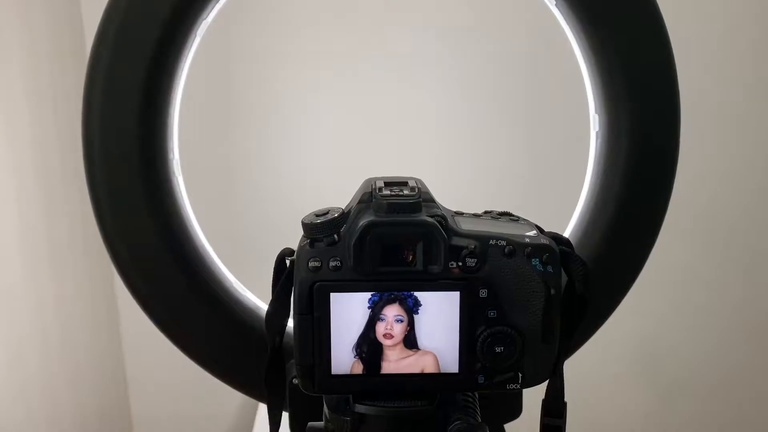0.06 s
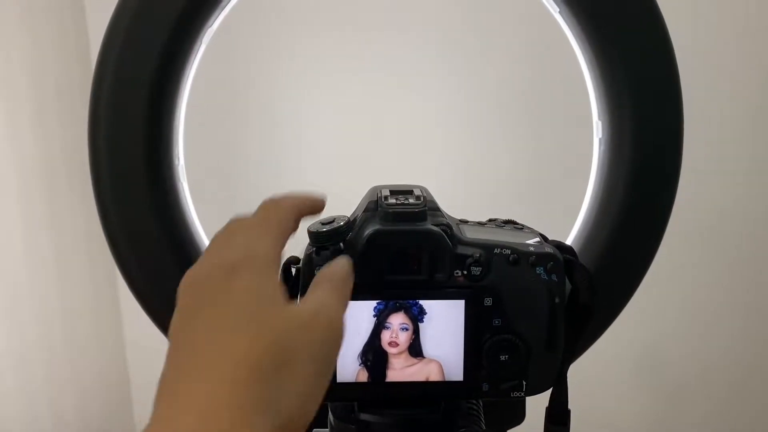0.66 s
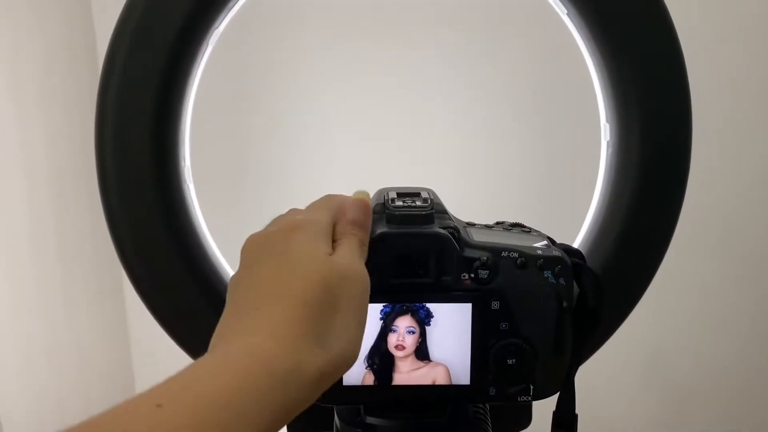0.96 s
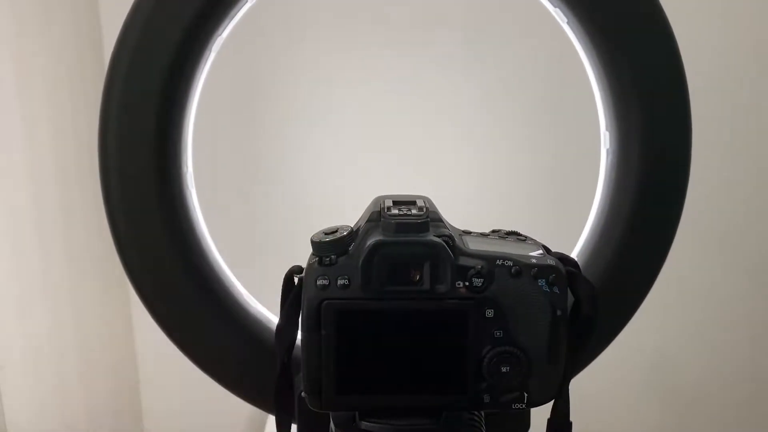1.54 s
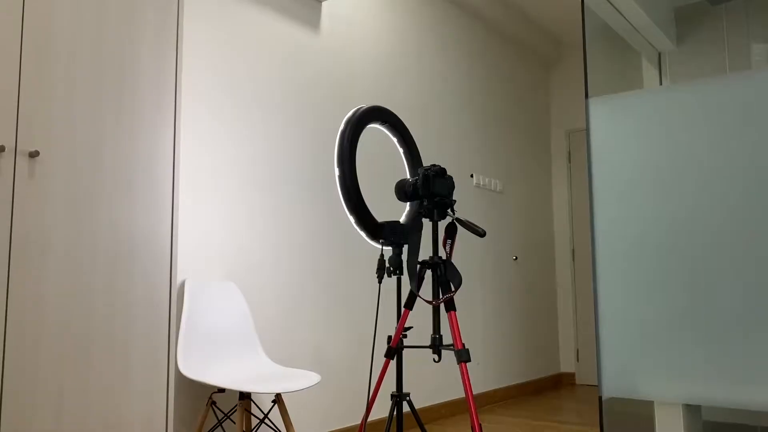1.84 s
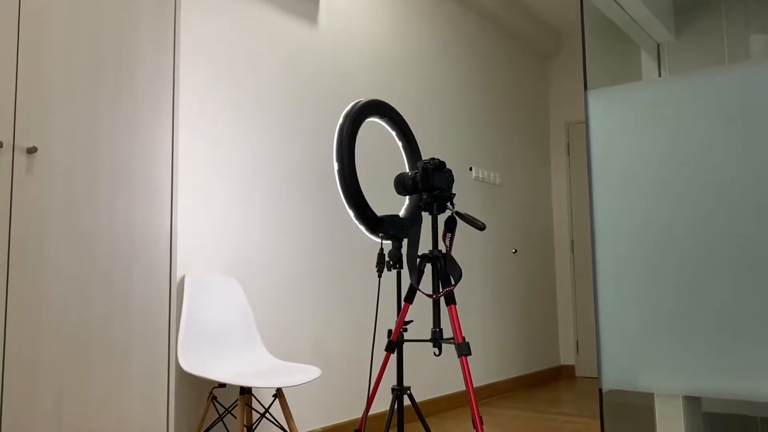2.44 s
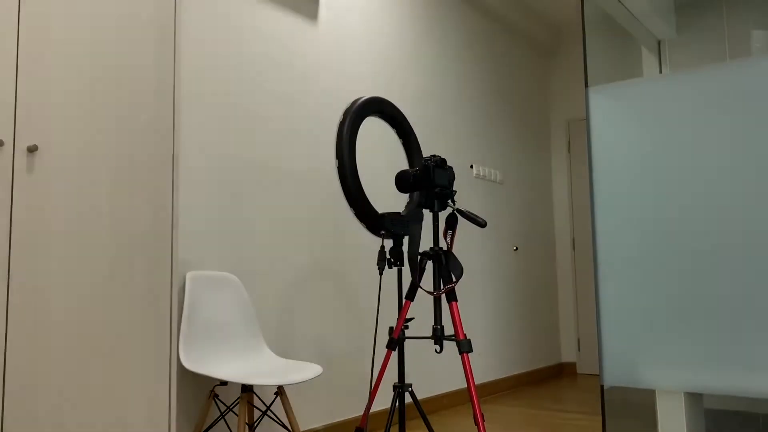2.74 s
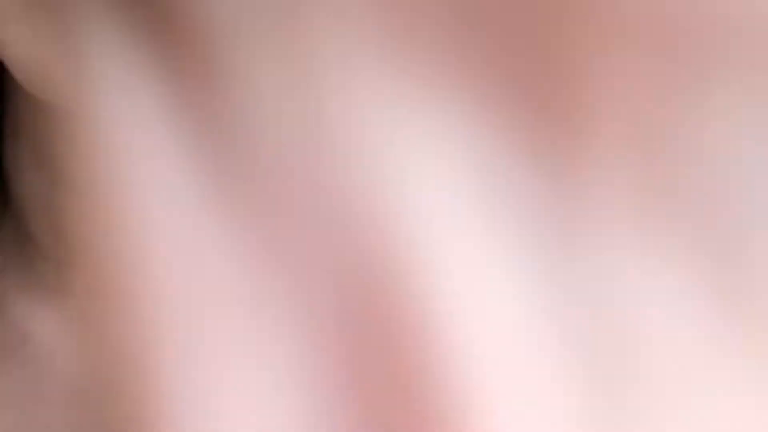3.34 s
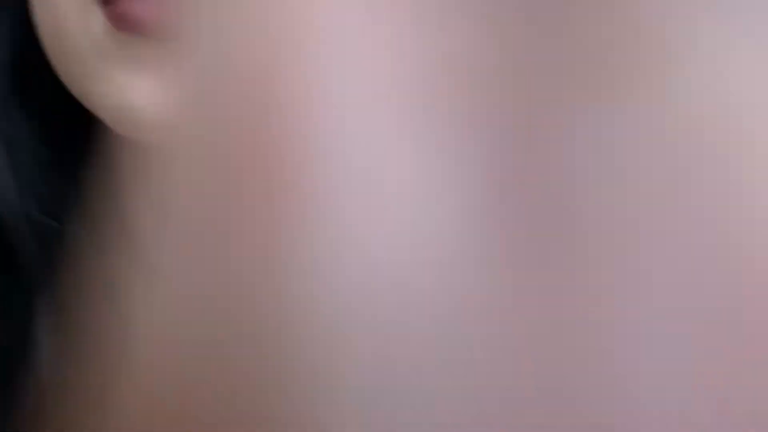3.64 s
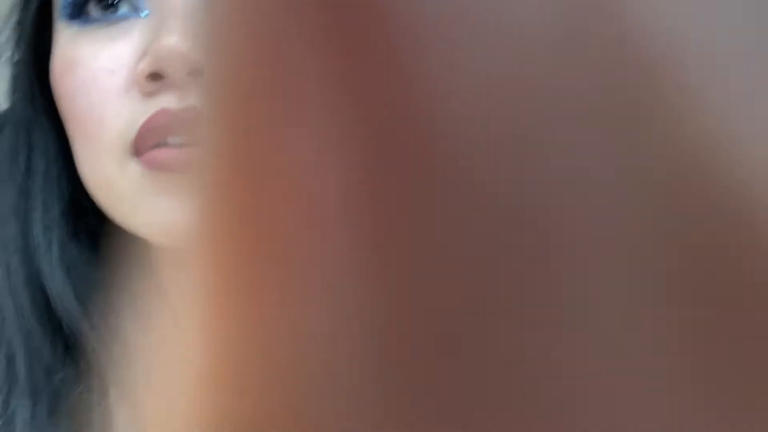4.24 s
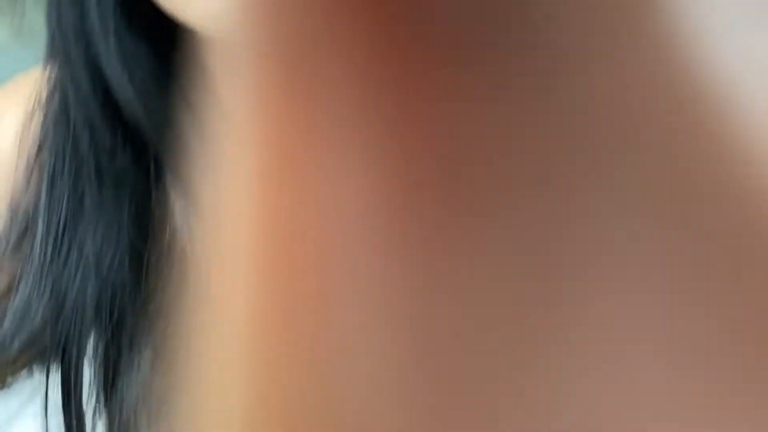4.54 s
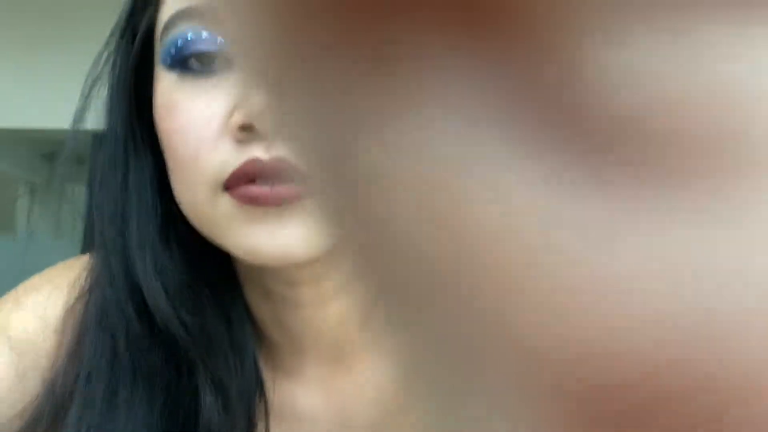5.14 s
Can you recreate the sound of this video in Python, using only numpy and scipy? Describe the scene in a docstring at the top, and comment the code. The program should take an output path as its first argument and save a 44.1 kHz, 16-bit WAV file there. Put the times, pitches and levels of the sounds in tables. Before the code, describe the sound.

Two sharp camera shutter clicks ring in a quiet room with a low ventilation hum, followed by soft handling bumps and rubbing.

```python
"""A ventilation fan hums throughout in a bare, quiet room. Fingers brush faintly on the listening phone.
At 1.2 s a reflex camera on a tripod clicks, heard from just behind: blows ring its body and the room.
At 1.4 s the shutter recocks with a clack and a geared whirr. At 2.1 s a second click is heard from
across the room. From 3.1 s the phone is carried by hand: fingers rub, tick and bump on its case,
and a draught swells."""
import sys
import numpy as np
from scipy import signal
from scipy.fft import rfft, irfft, next_fast_len
from scipy.io import wavfile
from scipy.ndimage import uniform_filter1d

SR = 44100
rng = np.random.default_rng(int(sys.argv[2]) if len(sys.argv) > 2 else 0)


def bounce(signal):
    """Save signal as a 16-bit WAV file at the path given by the first command-line argument."""
    frames = np.transpose(np.atleast_2d(signal))
    limited = np.clip(frames, -1, 1)
    pcm = np.round(limited * 32767).astype(np.int16)
    wavfile.write(sys.argv[1], SR, pcm)


N = 229142
T = np.arange(N) / SR

BEHIND, ACROSS, IN_HAND = range(3)  # listening places
PLACE_STARTS_S = [0, 1.787, 3.062]  # per place: start_s

# mechanism snaps: start_s, energy_db, rattle_decay_s, tilt_db_per_octave, pan_db (left minus right)
SHUTTER_BLOWS = [(1.216, 4, 0.00021, 4, -2), (1.2169, 0.5, 0.0015, -1.5, 2.5),
                 (1.2227, -6.5, 0.0021, 0, -4), (1.2264, -13, 0.001, -6, 4), (1.4205, -10, 0.0018, -5, -2),
                 (1.4259, -16.5, 0.0021, -13, 8.5), (1.437, -17.5, 0.0034, -7.5, 0),
                 (1.4635, -17, 0.0013, 6, -1), (1.4972, -28, .003, -11, 6), (1.516, -32, .0015, -10, 0),
                 (2.1425, -7.5, 0.0016, 2, 9.5), (2.1438, -.7, 0.0011, 2, 3),
                 (2.1541, -13.5, 0.0053, -3, 2.5)]
# camera body; springs and blades that ring on: pitch_hz, width_hz, behind_db, across_db
BODY_MODES = [(545, 88, -25, -3), (1002, 400, -28, -16.5), (1597, 330, -13, -10), (2622, 130, -15, -1.5),
              (3400, 250, -17.5, -10.5), (4133, 250, -11.5, -2), (4865, 390, -7.5, -0.5),
              (5220, 310, -17, 4), (6250, 430, -3.5, -3.5), (7190, 570, -0.5, -13.5),
              (7750, 210, -2.5, -11), (8630, 400, -10, -19), (10000, 970, -5, -31),
              (11370, 1000, -6.5, -30), (15200, 840, -10, -36)]
SPRING_MODES = [(2790, 220, -17.5, -7), (5200, 110, -9.5, -9), (6600, 120, -3.5, -13.5),
                (7160, 35, 0.5, -19), (10010, 109, -4, -19), (10720, 60, -1, -12)]
GEAR_SPECTRUM = [(200, -14), (700, -8), (1200, -4.5), (1650, 6), (2100, -4), (3600, -1), (7000, -7.5),
                 (9000, -11), (12000, -11.5), (16000, -24)]  # freq_hz, level_db
# wall reflections: freq_hz, level_db
ROOM_BEHIND_SPECTRUM = [(100, -30), (300, -17), (550, -11), (900, -13), (1300, -7), (1700, -2), (1950, -6),
                        (2500, -3), (4000, -4), (6700, 2), (8700, -3), (10500, 2.5), (12300, -3.5),
                        (13500, -14), (15000, -2)]
ROOM_ACROSS_SPECTRUM = [(200, -22), (550, -7), (1150, -13.5), (1500, -10.5), (2000, -15.5), (2800, -5),
                        (3600, -12.5), (4300, -4.5), (5200, -0.5), (5700, -5), (6500, -6.5), (8800, -19),
                        (10500, -10), (12200, -17), (13500, -25), (15000, -19), (16000, -34)]
ROOM_DECAY = [(400, 0.7), (2000, 0.79), (5000, 0.72), (9000, 0.58), (15000, 0.4)]  # freq_hz, t60_s

FINGER_TICKS = [(.803, -57, .0008, 6000, -63, -4), (.826, -58, .0008, 11500, -63, 0),
                (.856, -62, 0.0032, 2790, -39.5, 4), (3.326, -52, .003, 5200, -44, 5),
                (3.340, -46, .006, 5000, -42, 6), (3.347, -44, .006, 2500, -38, 2),
                (3.3977, -41, 0.0048, 5360, -30.5, 14), (3.401, -36, .004, 1480, -29.5, 4),
                (3.407, -40, .003, 2900, -31, 7), (3.418, -45, .003, 4300, -41, 4),
                (3.439, -44, .004, 3300, -38, 7), (3.4551, -46, 0.00051, 10100, -25, 2),
                (3.970, -43, 0.0039, 4830, -43, 1), (4.030, -45, 0.0021, 9020, -52, 2),
                (4.5752, -44, 0.00054, 3700, -34.5, 3.5), (4.576, -49, 0.0012, 2400, -29.5, 13),
                (4.6685, -55, .0005, 3100, -44, 7), (4.741, -37.5, 0.00069, 2110, -34, 5),
                (4.858, -30.5, 0.0054, 1390, -25.5, 2), (4.8667, -23.5, 0.0028, 3400, -30, 6),
                (4.8712, -16, 0.0013, 800, -17.5, 3), (4.875, -29, 0.014, 1190, -20.5, 4),
                (4.881, -30, 0.0021, 3400, -34, -3), (4.8968, -36, 0.0026, 6200, -47.5, 7),
                (4.922, -35.5, 0.0012, 3400, -44, 2), (5.003, -35, 0.0044, 2400, -30, 1),
                (5.031, -39, 0.0016, 11000, -53, 4), (5.116, -43.5, 0.00059, 3400, -35.5, 4),
                (5.187, -54, .003, 1700, -22.5, 6), (5.1875, -53, 0.0017, 3420, -24, 5.5),
                (5.188, -54, 0.0015, 5200, -28, 11)]  # start_s, crack_db, decay_s, ring_hz, ring_db, pan_db
CASE_MODES = [(2540, 450, 7.5), (3400, 280, 7), (4380, 390, -1.5), (6200, 320, 4), (9860, 580, 4),
              (11000, 440, 1.5)]  # pitch_hz, width_hz, gain_db
HAND_BUMPS = [(3.091, -19, 0.011, 121, -2), (3.426, -16, 0.013, 89.7, 3), (3.456, -5, 0.014, 240, -1),
              (3.498, -10.5, 0.0062, 120, 0.5), (4.262, -16, 0.013, 130.3, 2.5),
              (4.578, -10, 0.025, 802, -0.5), (4.670, -18.5, 0.0053, 1010, 2), (4.874, -10, .014, 293, -1),
              (4.903, -7.5, 0.0042, 80, 6), (5.006, -5.5, 0.007, 131, 3), (5.026, -5.5, 0.0046, 110, -2),
              (5.187, -13, 0.0076, 905, 9)]  # start_s, energy_db, decay_s, start_hz, pan_db
SKIN_SQUEAKS = [(3.45, 0.13, -77, 15600, 15200), (3.56, 0.11, -72, 15700, 13800),
                (3.693, 0.063, -72.5, 14700, 15840), (3.702, 0.15, -76, 10700, 9800),
                (3.79, 0.05, -76, 15700, 15300)]  # start_s, length_s, level_db, start_hz, final_hz
# sliding skin; shifting grip: peak_s, level_db, rise_s, fall_s
RUB_SWELLS = [(.875, -69.5, 0.05, 0.081), (1.06, -72, 0.028, 0.04), (3.344, -54.5, 0.012, 0.028),
              (3.402, -46, 0.0079, 0.019), (3.448, -49, 0.03, 0.02), (3.47, -58, 0.16, 0.23),
              (4.873, -49, 0.0092, 0.016), (4.94, -61, 0.063, .09), (4.58, -68.5, .015, .03)]
SIZZLE_SWELLS = [(4.2, -85, 0.096, .08), (4.45, -85, 0.26, 0.4)]
# their friction noise: freq_hz, level_db
RUB_SPECTRUM = [(300, 3), (1400, 0.5), (3000, -6), (6000, -10.5), (8500, -17), (10500, -10.5),
                (13000, -20.5), (15500, -19)]
SIZZLE_SPECTRUM = [(3000, -18), (7200, -7), (8050, 7), (8900, -4), (9900, -1), (11500, -17), (15000, -27)]

FAN_TONES = [(65.95, -78, -67, -55), (81.2, -63, -57.5, -83), (163.6, -60.5, -69, -68),
             (211.5, -74.5, -67.5, -62.5), (246, -65, -69, -71.5), (320, -73.5, -65, -66.5),
             (358.8, -73, -81.5, -74.5)]  # pitch_hz, behind_db, across_db, in_hand_db
# moving air: freq_hz, level_db
AIR_BEHIND_SPECTRUM = [(15, -31.5), (25, -9.5), (84, -7.5), (127, -11.5), (166, -4.5), (200, -10),
                       (256, -9.5), (317, -17), (405, -15.5), (677, -25), (1020, -24), (1940, -37),
                       (2760, -44.5), (3340, -50), (16000, -71.5)]
AIR_ACROSS_SPECTRUM = [(15, -58.5), (25, -23.5), (41, -12.5), (70, 0.5), (157, -11.5), (175, -10.5),
                       (206, -11), (285, -12), (317, -15), (607, -24), (659, -24), (1440, -28.5),
                       (1790, -38), (2910, -43.5), (16000, -74.5)]
AIR_HAND_SPECTRUM = [(15, -38), (25, -4), (80, 0.5), (153, -7.5), (229, -5.5), (317, -17), (344, -13),
                     (531, -16), (607, -20), (1400, -25), (4250, -48), (8140, -62.5), (16000, -68)]
DRAUGHT_SPECTRUM = [(40, -8), (90, 11), (220, 0.5), (450, -9), (850, -8.5), (1150, -7), (1450, -6),
                    (1700, -19), (2900, -29.5), (3400, -27.5), (4500, -39), (8500, -46), (15000, -58.5)]
AIR_LEVELS_DB = [-52.5, -50.5, -49.5]  # per place: level_db
DRAUGHT_SWELLS = [(3.6, -56, 0.206, 0.96), (4.97, -43, 0.014, 0.018), (5.12, -44.5, .65, 4.7)]  # peak_s, level_db, rise_s, fall_s
STEREO_WIDTH = [(60, -9.5), (110, -8), (200, -6.5), (380, -2), (700, 1.5), (15000, -1.5)]  # freq_hz, side_minus_mid_db


def shutter(dull_share=0.45):
    """Each blow rings the camera body and, from its own spot, sets off its own reflections."""
    out = np.zeros((2, N))
    ring_hz, width_hz, behind_db, across_db = np.transpose(SPRING_MODES)
    impulse = 1. * (T[None, :2] == 0)
    for start_s, energy_db, decay_s, tilt_db, pan_db in SHUTTER_BLOWS:
        behind = start_s < PLACE_STARTS_S[ACROSS]
        add(out, start_s, undb(energy_db) * pan(pan_db) * body_click(decay_s, tilt_db, behind))
        if behind:
            dull_db = dull_share * min(tilt_db, 0)  # soft blow, duller reflections
            spectrum = [(hz, db + dull_db * np.log2(hz)) for hz, db in ROOM_BEHIND_SPECTRUM]
            tail = room(impulse, spectrum, zip(ring_hz, width_hz, behind_db), build_s=0.0033)
            tail = undb(-4.5) * pan(1.1) * tail[:, :int((PLACE_STARTS_S[ACROSS] - start_s) * SR)]
        else:
            tail = room(impulse, ROOM_ACROSS_SPECTRUM, zip(ring_hz, width_hz, across_db), build_s=0.0014)
            tail = undb(-5) * pan(1.9) * tail
        add(out, start_s, undb(energy_db) * tail)
    return out


def body_click(decay_s, tilt_db, behind, even_decay_s=0.0012, growth_db_per_doubling=8.5):
    """One blow through the body modes; a longer rattle is also stronger."""
    push = contact(decay_s, rattle_db=growth_db_per_doubling * np.log2(decay_s / even_decay_s))
    click = 0
    for k, (hz, width_hz, behind_db, across_db) in enumerate(BODY_MODES):
        mode_db = (behind_db if behind else across_db) + tilt_db * np.log2(hz)
        click = click + (-1) ** k * undb(mode_db) * resonate(push, hz, width_hz)
    left, right = click
    right_lag_s = 25e-6 if behind else 65e-6
    return np.array([unit(left), unit(np.roll(right, round(right_lag_s * SR)))])


def rewind(tooth_hz=270, mesh_db=3):
    """A motor jolts, then labours until the spring is cocked; gear teeth chop the whirr."""
    teeth = sine(tooth_hz * (1 + 0.16 * walk(60)))
    jolt = swell(peak_s=1.424, level_db=-40.5, rise_s=0.0096, fall_s=0.012)
    load = swell(peak_s=1.495, level_db=-42, rise_s=0.037, fall_s=0.017)
    whirr = noise(GEAR_SPECTRUM) * undb(mesh_db * teeth) * (jolt + load)
    reflections = undb(-9) * room(whirr, [(200, -0.17), (15000, -1.6)])
    return (whirr + reflections) * place_gate(BEHIND)


def ticks(crack_hz=8950, crack_width_hz=16000, spot_q=2.9):
    """Fingers on plastic: a bright crack and the touched spot's ring, both through the case modes."""
    out = np.zeros((2, N))
    for start_s, crack_db, decay_s, ring_hz, ring_db, pan_db in FINGER_TICKS:
        push = contact(decay_s, rattle_db=4)
        bands = (crack_db, crack_hz, crack_width_hz), (ring_db, ring_hz, ring_hz / spot_q)
        for energy_db, hz, width_hz in bands:
            tick = resonate(resonate(push, hz, width_hz), hz, 2 * width_hz)
            case = sum(undb(db) * resonate(tick, mode_hz, band_hz) for mode_hz, band_hz, db in CASE_MODES)
            add(out, start_s, undb(energy_db) * pan(pan_db) * unit(tick + case))
    return out


def bumps(settled_hz=67.3, settle_s=0.003):
    """Soft thuds of the hand; pitch drops as the flesh spreads."""
    out, t = np.zeros((2, N)), T[:SR // 4]
    for start_s, energy_db, decay_s, start_hz, pan_db in HAND_BUMPS:
        pitch_hz = settled_hz + (start_hz - settled_hz) * np.exp(-t / settle_s)
        thud = sine(pitch_hz) * np.exp(-t / decay_s) * (1 - np.exp(-t * start_hz))
        add(out, start_s, undb(energy_db) * pan(pan_db) * unit(thud))
    return out


def rubbing(grain_db=2, grip_db=2):
    """Skin drags on plastic; a thin sizzle as the grip shifts."""
    strokes = friction(RUB_SPECTRUM) * swells(RUB_SWELLS)
    sizzle = friction(SIZZLE_SPECTRUM) * swells(SIZZLE_SWELLS)
    return (strokes + sizzle) * undb(grain_db * walk(300) + grip_db * walk(30))


def friction(spectrum, slips_per_s=1200, spread_db=1, hiss_db=3.5):
    """Stick and slip: tiny uneven catches over an even hiss; rms one."""
    catches = rng.random(N) < slips_per_s / SR
    sizes = undb(spread_db * np.minimum(rng.exponential(size=N), 5))
    slips = unit(colour(catches * sizes * rng.standard_normal((2, N)), spectrum)) * np.sqrt(N)
    return unit(slips + undb(hiss_db) * noise(spectrum)) * np.sqrt(N)


def squeaks(waver_hz=380, stutter_db=5):
    """Skin squeaks in thin, rough glides."""
    out = np.zeros((2, N))
    for start_s, length_s, level_db, start_hz, final_hz in SKIN_SQUEAKS:
        size = int(length_s * SR)
        pitch_hz = np.linspace(start_hz, final_hz, size) + waver_hz * (walk(40) / 2 + walk(1500))[:size]
        grip = undb(level_db + stutter_db * walk(149)[:size]) * np.sqrt(np.hanning(size))
        add(out, start_s, pan(0) * grip * sine(pitch_hz))
    return out


def room(x, spectrum, rings=(), build_s=0.0059, clumps_per_s=260, clump_db=2.2):
    """Reflections off bare walls arrive in clumps; treble dies first."""
    hz, time_s, bins = signal.stft(colour(rng.standard_normal((2, SR)), spectrum), SR, nperseg=256)
    decay = undb(-60 * time_s / along(ROOM_DECAY, hz)[:, None])
    clumps = undb(clump_db * walk(clumps_per_s)[:SR])
    onset = 1 - np.exp(-T[:SR] / build_s)
    tail = signal.istft(bins * decay, SR)[1][:, :SR] * clumps * onset
    for ring_hz, width_hz, gain_db in rings:
        tail = tail + undb(gain_db) * resonate(tail, ring_hz, width_hz)
    return signal.fftconvolve(x, unit(tail), axes=1)[:, :N]


def ventilation(waver_db=2.5, drift_hz=3):
    """Fan tones, set per place by standing waves; moving air; draught on the carried phone."""
    gates = np.array([place_gate(place) for place in (BEHIND, ACROSS, IN_HAND)])
    out = np.zeros((2, N))
    for pitch_hz, *levels_db in FAN_TONES:
        tone = np.sqrt(2) * sine(pitch_hz + drift_hz * walk(16))
        out += tone * (undb(levels_db) @ gates) * undb(waver_db * walk(6.5))
    spectra = AIR_BEHIND_SPECTRUM, AIR_ACROSS_SPECTRUM, AIR_HAND_SPECTRUM
    for gate, spectrum, level_db in zip(gates, spectra, AIR_LEVELS_DB):
        out += gate * undb(level_db + walk(8)) * noise(spectrum)
    draught = noise(DRAUGHT_SPECTRUM) * swells(DRAUGHT_SWELLS) * undb(2.9 * walk(8.3))
    return (out + draught) * pan(2.67)


def contact(decay_s, rattle_db):
    """Sharp push, then a dying rattle that differs at each ear."""
    t = T[:SR // 6]
    rattle = unit(rng.standard_normal((2, len(t))) * np.exp(-t / decay_s))
    return (t == 0) + undb(rattle_db) * rattle


def place_gate(place):
    """One while the phone is at this place, else zero."""
    here = np.searchsorted(PLACE_STARTS_S, T, side="right") - 1 == place
    return uniform_filter1d(here * 1., size=128)


def swell(peak_s, level_db, rise_s, fall_s):
    """Gain with exponential rise and fall."""
    return undb(level_db) * np.exp(-np.maximum((peak_s - T) / rise_s, (T - peak_s) / fall_s))


def swells(rows):
    """Power sum of swells."""
    return np.sqrt(sum(swell(*row) ** 2 for row in rows))


def noise(spectrum):
    """Coloured stereo noise, rms one; bass alike at both ears."""
    mid, side = rng.standard_normal((2, N))
    side = colour(side, STEREO_WIDTH)
    return unit(colour(np.array([mid + side, mid - side]), spectrum)) * np.sqrt(N)


def colour(x, spectrum):
    """Filter by freq_hz, level_db points."""
    size = next_fast_len(x.shape[-1])
    gain = undb(along(spectrum, np.fft.rfftfreq(size, 1 / SR)))
    return irfft(rfft(x, size) * gain, size)[..., :x.shape[-1]]


def along(points, hz):
    """Interpolate on a log-frequency axis."""
    points_hz, values = np.transpose(points)
    return np.interp(np.log(hz + 1), np.log(points_hz), values)


def walk(rate_hz):
    """Smooth random curve, spread near one."""
    size = max(int(SR / rate_hz), 1)
    return uniform_filter1d(np.repeat(rng.standard_normal(N // size + 1), size), size)[:N]


def resonate(x, hz, width_hz):
    """One resonance, unity peak gain."""
    return signal.lfilter(*signal.iirpeak(hz, hz / min(width_hz, SR / 3), fs=SR), x)


def sine(pitch_hz):
    """Sine along a pitch curve."""
    return np.sin(2 * np.pi * np.cumsum(pitch_hz) / SR)


def add(out, start_s, x):
    """Mix x in at start_s."""
    start = int(start_s * SR)
    out[:, start:start + x.shape[1]] += x[:, :N - start]


def pan(db):
    """Stereo gains for left minus right level."""
    return undb(np.array([[db], [-db]]) / 2)


def unit(x):
    """Scale to mean channel energy one."""
    return x / np.sqrt(np.mean(np.sum(x ** 2, axis=-1)))


def undb(db):
    """Decibels to gain."""
    return 10 ** (np.asarray(db) / 20)


def scene():
    """Camera, fan and hand."""
    return shutter() + rewind() + ventilation() + rubbing() + squeaks() + ticks() + bumps()


def record(dry, low_hz=32, top_hz=16100):
    """The phone cuts deep bass and top treble."""
    thin = signal.sosfilt(signal.butter(3, low_hz, "high", fs=SR, output="sos"), dry)
    return signal.sosfilt(signal.ellip(8, .2, 70, top_hz, fs=SR, output="sos"), thin)


dry = scene()
out = record(dry)
bounce(out)
```